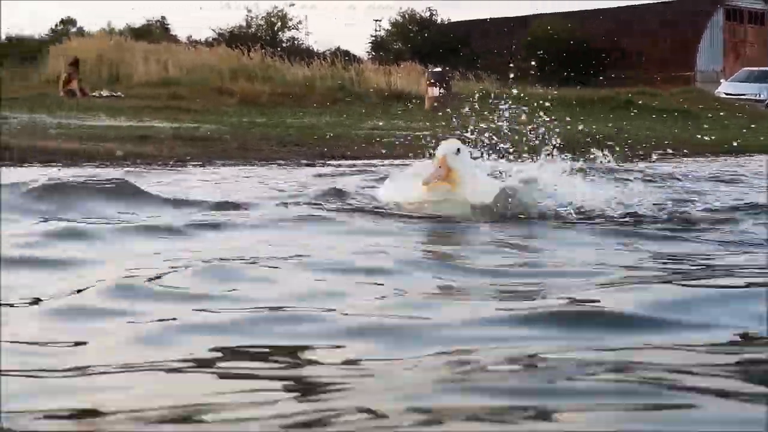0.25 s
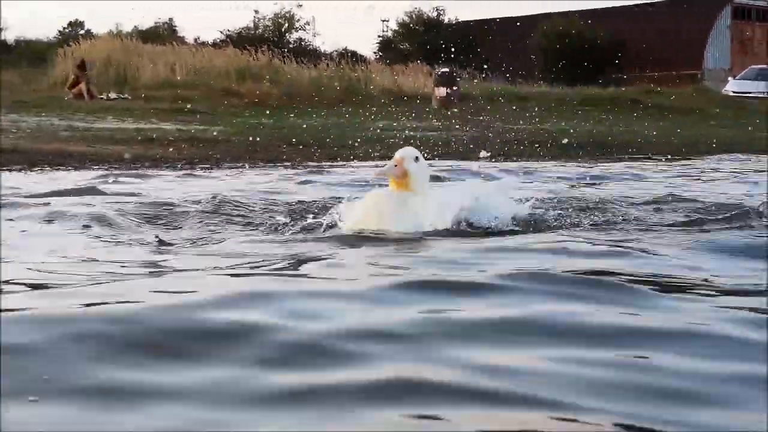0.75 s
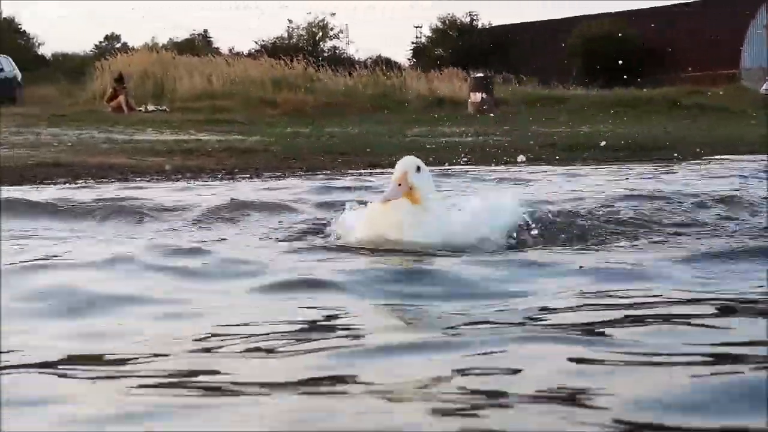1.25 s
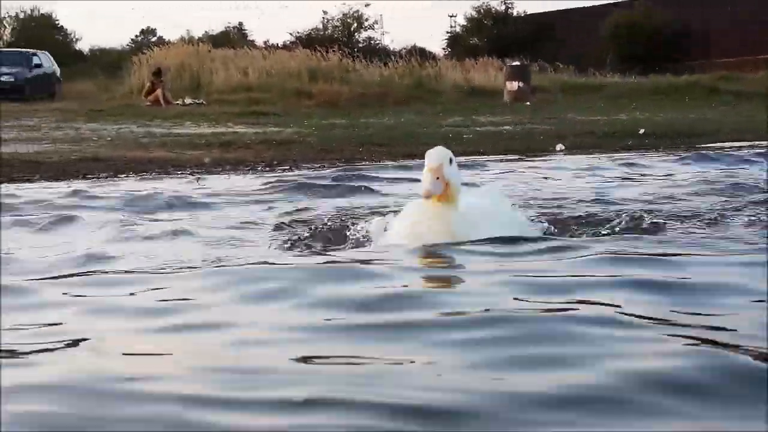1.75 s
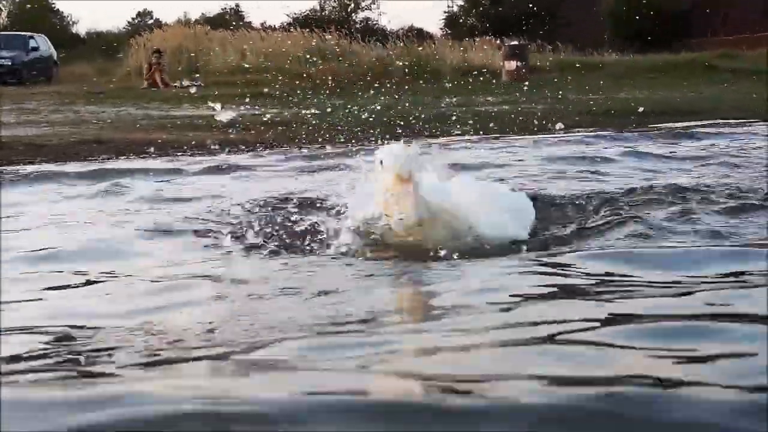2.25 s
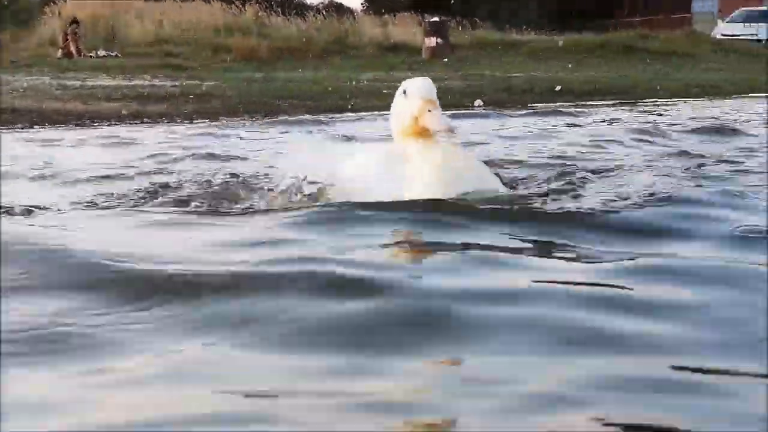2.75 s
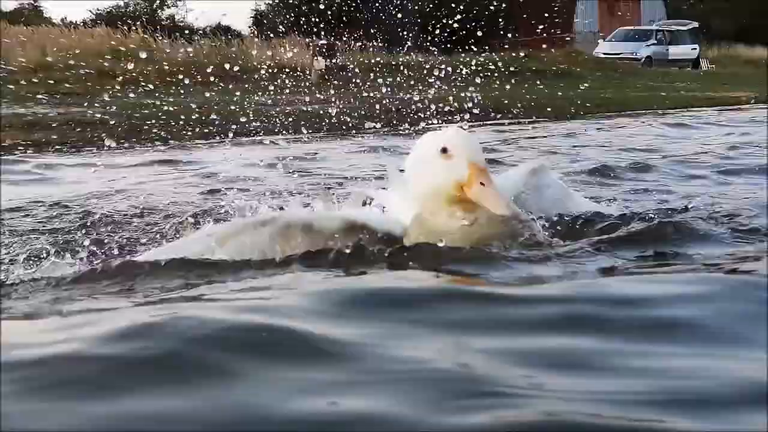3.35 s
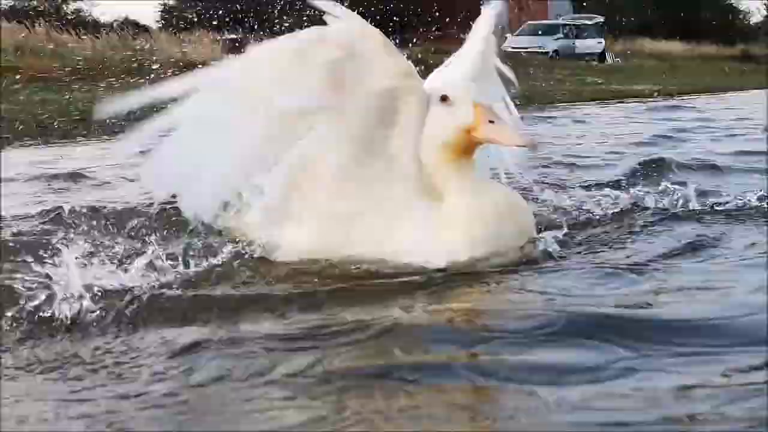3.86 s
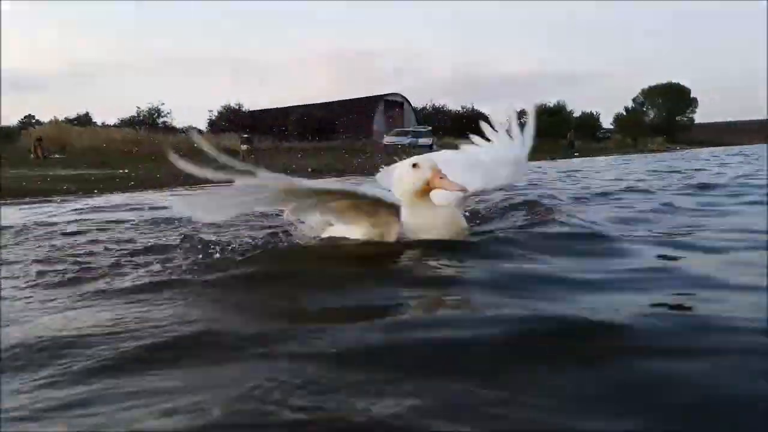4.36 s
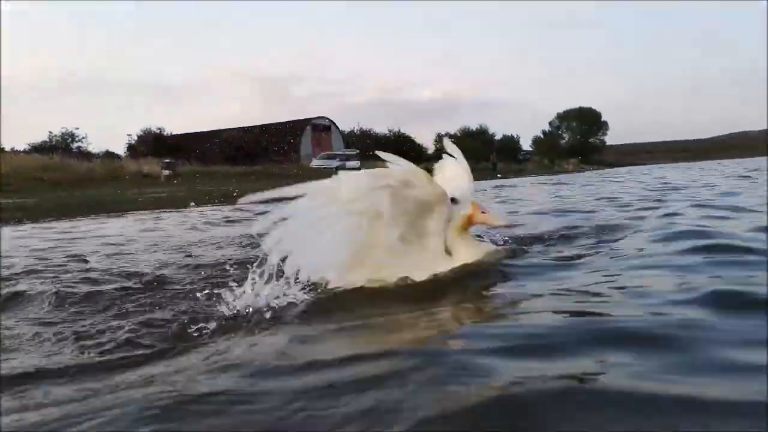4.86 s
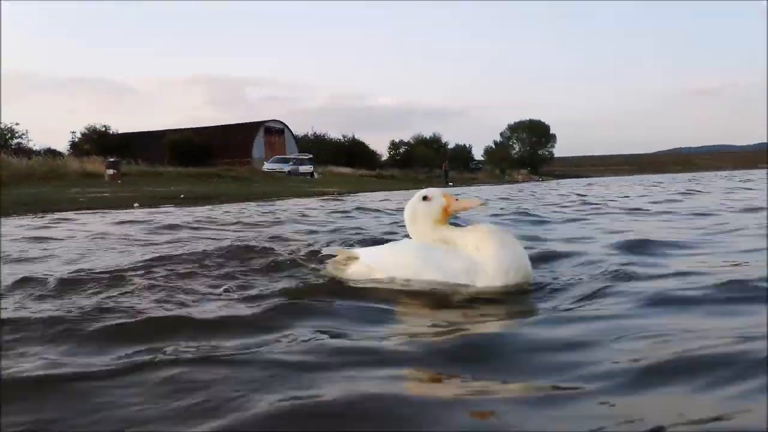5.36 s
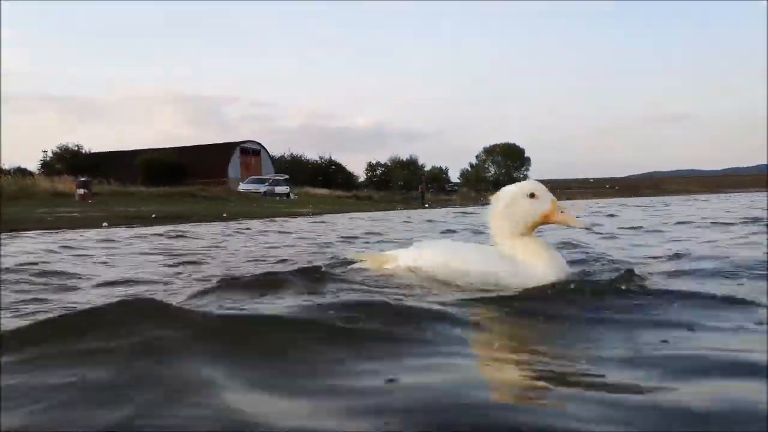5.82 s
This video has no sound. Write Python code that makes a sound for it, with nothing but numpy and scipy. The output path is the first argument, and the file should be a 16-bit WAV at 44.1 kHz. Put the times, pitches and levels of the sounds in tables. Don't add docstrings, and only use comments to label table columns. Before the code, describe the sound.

Open lake, no echo, stereo microphone a few metres from a duck, with deep wind buffeting throughout as rumble, flutter and soft thumps. It begins mid-splash: heavy wet slaps at about 0.06, 0.2 and 0.4 s in churning, hissing spray, another at 0.6 s. From 0.8 to 1.8 s the splashing weakens to small spatters, droplet ticks and fizzing bubbles. Around 1.9 s a loud short bubble pop and renewed slaps start another surge, with bloops and splashes to 2.5 s. From 2.9 s it is closer and fuller, with repeated slaps, a very hard one near 3.37 s, then bright, crisp wingbeat spray from 3.7 to 4.9 s, including strong cracks at 4.7 and 4.86 s. By 5.1 s the splashing fades. Gusts continue over sparse tiny drips, a sharper one near 5.66 s, faint lapping and almost inaudible distant chirps at 5.2-5.4 and 5.8 s.

```python
import sys
import numpy as np
from scipy import signal
from scipy.fft import rfft, irfft, next_fast_len
from scipy.io import wavfile
from scipy.ndimage import uniform_filter1d, map_coordinates

SR = 44100
rng = np.random.default_rng(int(sys.argv[2]) if len(sys.argv) > 2 else 0)


def dump_mix(stems):
    frames = np.atleast_2d(stems).T
    limited = np.clip(frames, -1, 1)
    pcm = np.round(limited * 32767).astype(np.int16)
    wavfile.write(sys.argv[1], SR, pcm)


def gain_from_db(level_db):
    decades = np.asarray(level_db, float) / 20
    return 10 ** decades


N = 268569

# start in seconds, hold in seconds, spray level in dB,
# mist over spray in dB.
STROKES = [(-0.012, 0.0091, -44, -14), (0.064, 0.091, -41.5, -9.5), (0.22, 0.099, -38, -9.5),
           (0.422, 0.11, -42, -8.5), (0.603, 0.069, -45, -7.5), (0.811, 0.033, -47.5, -11),
           (0.94, 0.032, -45.5, -10.5), (1.045, 0.01, -52.5, -13.5), (1.15, 0.02, -50, -10),
           (1.296, 0.041, -48, -7.5), (1.524, 0.002, -50.5, -8), (1.648, 0.0082, -53.5, -9.5),
           (1.72, 0.016, -52, -10.5), (1.887, 0.09, -43.5, -15), (2.068, 0.017, -41, -11),
           (2.231, 0.061, -43.5, -9), (2.434, 0.001, -40, -12), (2.519, 0.051, -43.5, -14.5),
           (2.695, 0.082, -44, -18), (2.838, 0.012, -42.5, -17), (2.901, 0.02, -40, -11.5),
           (3.043, 0.055, -36.5, -8.5), (3.216, 0.034, -35, -13.5), (3.349, 0.11, -41.5, -9),
           (3.556, 0.022, -39.5, -5.5), (3.705, 0.0086, -36, -3.5), (3.861, 0.047, -38.5, -4),
           (3.99, 0.024, -40, -1.5), (4.09, 0.0043, -48, -11), (4.165, 0.003, -42.5, -1.5),
           (4.276, 0.043, -42.5, -3), (4.426, 0.00092, -36.5, -9), (4.515, 0.16, -42, -5),
           (4.712, 0.17, -41.5, -6.5)]
# frequency in Hz, level in dB per Hz.
SPRAY_TONE = [(260, -9), (450, -14), (651, -9), (1000, -4.5), (1110, -8.5), (1850, -2.5), (2050, -4.5),
              (2840, -4.5), (5200, -15), (6760, -34.5), (11400, -120)]
# frequency in Hz, level in dB per Hz.
MIST_TONE = [(2650, -14.5), (4000, -13.5), (5350, -1.5), (6490, -8.5), (8140, -10.5), (9420, -9.5),
             (10800, -16), (11700, -16), (14500, -25.5), (15300, -23), (16300, -38)]
SPRAY_DB, MIST_DB = 1.5, -1
SPRAY_RISE, SPRAY_FALL, SPRAY_LINGER_S = 305, 107, 0.013
MIST_STEEPER = 1.26
SETTLED_S = 5.07

# start in seconds, hold in seconds, rumble level in dB,
# flutter over rumble in dB.
GUSTS = [(-0.01, 0.05, -25.5, -11.5), (0.17, 0.01, -34, -7.5), (0.235, 0.08, -28, -9),
         (0.41, 0.06, -27.5, -7.5), (0.57, 0.1, -29, -17), (0.9, 0.04, -30.5, -21),
         (0.992, 0.035, -26.5, -11), (1.115, 0.045, -24.5, -8), (1.325, 0.002, -33, -14),
         (1.425, 0.044, -29, -14), (1.572, 0.043, -29, -19), (1.825, 0.069, -33, -11.5),
         (1.995, 0.0038, -30, -33), (2.148, 0.2, -26.5, -8.5), (2.43, 0.05, -32.5, -12),
         (2.549, 0.001, -26, -4), (2.642, 0.007, -34, -11), (2.737, 0.18, -29, -9.5), (3.07, 0.23, -30, -7),
         (3.39, .19, -29, -5.5), (3.647, 0.14, -31.5, -4), (3.934, 0.29, -30, 0), (4.34, 0.23, -29.5, -3.5),
         (4.66, 0.3, -29.0, -6.5), (4.969, 0.084, -27.5, -8), (5.133, 0.12, -28.5, -6.5),
         (5.401, 0.073, -27.5, -7.5), (5.515, 0.14, -28.5, -5), (5.842, 0.15, -25.5, -11.5)]
# frequency in Hz, level in dB per Hz.
RUMBLE_TONE = [(11, -38), (18, 1), (64, -3.5), (130, -10.5), (170, -39), (290, -120)]
# frequency in Hz, level in dB per Hz.
FLUTTER_TONE = [(50, -120), (75, 3.5), (110, -8), (160, -2.5), (230, -18.5), (330, -24.5), (500, -35.5),
                (900, -120)]
# frequency in Hz, gain in dB.
PRESSURE_TONE = [(8, -42.0), (22, 1.0), (300, 1.5), (520, -4.0), (900, -67.5)]
RUMBLE_DB, FLUTTER_DB, CALM_DB = -1.5, -1.5, -47
GUST_RISE, GUST_FALL, GUST_LINGER_S = 300, 300, .035
FLUTTER_STEEPER = 1.15
# time in seconds, peak level in dB.
PUFFS = [(0.224, -29.5), (0.308, -28.5), (0.426, -18), (1.149, -21.5), (2.346, -34.5), (2.557, -19.5),
         (3.366, -31), (3.487, -28.5), (3.958, -30), (4.141, -26.5), (4.188, -19), (4.26, -28),
         (4.531, -29.5), (4.717, -26), (4.986, -29), (5.045, -26), (5.224, -29), (5.605, -24), (5.962, -26)]
PUFF_HZ = 195
# time in seconds, peak level in dB, frequency in Hz.
SHOVES = [
    (0.33, -19, 106),
    (1.218, -24, 110),
    (2.637, -16.5, 96),
          (0.235, -37, 56), (0.26, -27, 60), (0.284, -21, 78), (0.348, -26, 92), (0.466, -32, 96),
          (0.531, -22, 54), (0.968, -23.5, 57), (1.011, -30, 53), (1.838, -24.5, 87), (2.15, -21, 61),
          (2.202, -32, 45), (2.257, -28, 103), (2.304, -33.5, 76), (2.543, -22.5, 59), (2.745, -27.5, 54),
          (2.81, -23, 67), (2.862, -25, 79), (3.408, -28, 101), (3.569, -23, 70), (3.662, -28.5, 73),
          (4.105, -22.5, 116), (4.128, -36.5, 42), (4.173, -24.5, 64), (4.199, -24, 78), (4.348, -30, 65),
          (4.389, -23.5, 74), (4.48, -25.5, 69), (4.665, -22, 119), (4.681, -29.5, 100), (4.767, -24, 41),
          (5.003, -25.5, 57), (5.139, -21.5, 108), (5.155, -23, 78), (5.24, -22, 132), (5.443, -25.5, 82),
          (5.521, -22, 112), (5.551, -19.5, 53), (5.566, -19, 49), (5.857, -22.5, 79), (5.877, -21, 86)]
# time in seconds, lag of the left port in samples.
CROSSING = [(0, 38.5)]

# frequency in Hz, level in dB per Hz.
RIPPLE_TONE = [(240, -13), (400, -14), (554, -9), (2140, -11), (4500, -22.5), (11300, -28.5), (15100, -36),
               (16300, -65)]
RIPPLE_DB = -64.5

# time in seconds, peak level in dB, thud in dB, #
# brightness in dB.
SLAPS = [(0.057, -11, -11, -29.5), (0.222, -10, 0, -26.5), (0.322, -46, -13, -30), (0.434, -16, -11, -21),
         (0.608, -19.5, -61, -22), (0.925, -23, -46, -32), (1.916, -24, -5, -46), (1.966, -23, -51, -23.5),
         (2.066, -18.5, -54, -28), (2.432, -18.5, -19, -21), (2.446, -23, -38, -18),
         (2.507, -20, -51, -18.5), (2.895, -13, -52, -40), (3.023, -16.5, -58, -25.5),
         (3.078, -16.5, -43, -26), (3.24, -16, -52, -19), (3.366, -6.5, -14.5, -16.5),
         (3.441, -21.5, -58, -24), (3.537, -16.5, -47, -19.5), (3.695, -15.5, -42, -21),
         (3.854, -20, -32, -15), (3.886, -18, -60, -21), (3.994, -23, -14, -8), (4.182, -28.5, -33, -4),
         (4.293, -18, -21, -19), (4.324, -23, -47, -16.5), (4.429, -17.5, -15, -8.5),
         (4.7125, -11.5, -26, -17.5), (4.856, -21.5, -61, -6.5), (6.084, -34.5, 8, -33)]

# time in seconds, peak level in dB, frequency in Hz,
# 60 dB decay in seconds, left over right in dB.
POCKETS = [(0.331, -22.5, 1250, 0.015, 2), (1.841, -38, 550, 0.065, 4), (1.968, -24, 1250, 0.024, 1),
           (2.053, -25, 1410, .025, 1), (2.289, -16, 1280, .01, 2), (2.436, -21, 2666, .032, 4),
           (2.929, -24, 1620, 0.026, -10), (2.955, -22, 2230, 0.022, 2), (3.023, -21.5, 1005, 0.026, 3),
           (3.143, -29.5, 1290, 0.031, -11), (3.272, -30.5, 956, 0.082, 0), (3.352, -18, 2070, 0.023, -0.5),
           (4.096, -20.5, 3350, .0082, -19), (4.195, -33.5, 846, 0.06, 9), (4.483, -21, 1072, 0.08, -9),
           (4.712, -10, 1490, 0.0091, 8.5), (4.906, -26, 1764, 0.032, -9)]
POCKET_RISE = .07
# time in seconds, peak level in dB, start pitch in Hz,
# 60 dB decay in seconds, pitch rise over that decay as a share.
RISERS = [
    (1.915, -7, 1280, 0.0062, .4),
    (2.067, -27, 1180, 0.038, 0.21),
    (2.107, -25, 876, 0.11, 1),
    (3.437, -30, 1220, 0.05, .44),
    (3.591, -24.5, 1145, 0.037, 0.45),
    (4.506, -30, 1170, 0.05, 0.83),
    (4.776, -33, 1440, 0.053, .57),
    (5.589, -35.5, 1640, .05, .47),
    (5.595, -51, 1200, 0.11, 0.97),
]
# time in seconds, peak level in dB, frequency in Hz,
# left over right in dB.
PLOPS = [(0.058, -23, 1330, 1), (0.432, -35, 2760, -9), (0.433, -39, 4570, -9), (0.881, -37, 3960, -12),
         (0.923, -38, 3360, -6), (0.929, -36.5, 1016, -2), (1.196, -31, 2130, -2), (1.198, -38, 1340, 0),
         (1.294, -33, 2520, -12), (1.404, -39, 2630, -6), (1.477, -51, 3700, -3), (1.522, -31.5, 2070, -1),
         (1.648, -31, 1770, -1), (1.724, -36, 1810, 1), (1.76, -32.5, 1890, -10), (1.836, -34.5, 3900, -12),
         (1.913, -26, 1810, 3), (1.968, -27, 3920, -8), (2.121, -47, 3750, -9), (2.392, -32, 2710, -2),
         (2.505, -38, 2200, 11), (2.506, -37, 1850, -4), (2.506, -30, 3300, -10), (2.595, -22, 2700, 1),
         (2.687, -45, 3570, -12), (2.693, -27.5, 1600, -5), (2.764, -28.5, 1510, -2),
         (2.777, -23.5, 2580, -3), (2.894, -33, 3670, -9), (3.237, -26.5, 1090, 4),
         (3.363, -21.5, 1630, -17), (3.364, -31, 860, 12), (3.534, -33, 1050, -9), (3.535, -31, 3380, -12),
         (3.536, -32, 1550, 7), (3.537, -34, 1920, -12), (3.693, -29, 944, -8), (3.692, -29, 1890, 6),
         (3.693, -26, 3300, -14), (3.852, -33, 2970, -2), (4.297, -31, 1850, -14), (4.34, -31, 1440, -6),
         (4.712, -28, 4130, -4), (4.712, -34, 2700, -6), (4.853, -36, 4570, -6), (4.855, -35, 3770, -10),
         (4.904, -26, 2110, 7), (4.985, -36.5, 2280, 16)]
PLOP_CYCLES, PLOP_RISE = 36, .08
# time in seconds, peak level in dB, frequency in
# Hz, left over right in dB.
DRIPS = [(5.06, -43, 5350, 7), (5.133, -47, 5740, -3), (5.161, -42.5, 1540, -1), (5.195, -52, 1530, 4),
         (5.252, -43, 3070, 6), (5.329, -48, 2830, 0), (5.412, -47.5, 1980, 10), (5.45, -44, 2355, -11),
         (5.487, -52.5, 2670, -15), (5.545, -46, 5440, 1), (5.57, -45, 1780, 15), (5.657, -34.5, 8050, -6),
         (5.85, -40, 1990, -12), (6.027, -48.5, 1335, -3),
         (5.09, -55, 3790, -16), (5.255, -66, 1030, -2), (5.493, -56, 1020, -2),
              (5.495, -69, 5160, -13), (5.535, -54, 1030, 1), (5.589, -53, 2330, -11),
              (5.683, -59, 5170, -18), (5.684, -51, 2800, -11), (5.71, -50, 3490, -4),
              (5.812, -53, 3360, -13), (5.817, -52, 2540, -11), (5.826, -55, 3620, -15),
              (5.87, -68, 5430, 5), (5.963, -65, 3660, -7)]
DRIP_CYCLES, DRIP_RISE = 51, .025

# time in seconds, peak level in dB, frequency in Hz.
MORE_DROPS = [(0.648, -29, 3200), (0.757, -38, 3200), (0.883, -34, 6000), (0.944, -42, 5440), (0.97, -25, 3600),
              (1.2, -32, 3000), (1.2833, -24, 5000), (1.32, -36, 4500), (1.648, -30.5, 5450), (1.84, -30, 1800),
              (2.0, -24.5, 1300), (2.597, -25, 4500), (2.837, -30, 4020), (2.85, -31, 3200), (3.005, -39, 3000),
              (3.2006, -24, 2820), (3.28, -26.5, 3800), (3.464, -25, 3100), (3.958, -20, 5900),
              (4.003, -11, 5060), (4.412, -21, 2500), (4.527, -28, 4500), (4.68, -25.5, 1280),
              (4.7155, -17, 3500), (4.8559, -2, 9500)]
# time in seconds, peak level in dB, frequency in Hz.
DROPS = [(0.79, -34, 4730), (0.849, -40, 4410), (1.0141, -34, 5900), (1.191, -26, 8750), (1.295, -25, 5300),
         (1.3369, -21, 5340), (1.48, -33, 4150), (1.5274, -26, 5430), (2.126, -18, 5360),
         (2.1777, -21.5, 4330), (2.583, -26, 4780), (2.792, -24.5, 3960), (4.106, -19.5, 5460),
         (4.2564, -17, 8900), (4.2758, -18, 5500), (4.5416, -16, 5300), (4.576, -17.5, 5200),
         (4.822, -24, 5570), (4.874, -28, 4670), (4.954, -30, 5380)]
# time in seconds, half length in seconds, peak level in dB,
# frequency in Hz.
SWARMS = [
    (.82, .02, -41, 2350),
    (1.35, .04, -39, 2750),
    (1.74, .03, -46, 2100),
    (2.78, .04, -44, 2700),
    (4.96, .03, -45, 2500),
    (5.78, .045, -56, 3400),
]

# time in seconds, peak level in dB, start pitch in Hz.
BIRD = [
    (5.16, -71, 3900),
    (5.222, -69, 3900),
    (5.292, -68, 3950),
    (5.365, -72, 3900),
    (5.776, -65, 4100),
]
CHIRP_S, CHIRP_FALL_HZ = .017, 430

# frequency in Hz, side level in dB.
WIDTH = [(1200, -4.5), (2000, 3), (8000, 1.5)]
# frequency in Hz, lead of the right port in radians.
BEND_FAR = [(700, 0), (2000, -1.87), (3800, -1.24), (4500, -2.5), (5900, 0), (9000, -1.5), (12000, -6)]
# frequency in Hz, lead of the right port in radians.
BEND_NEAR = [(700, 0), (1400, 0.33), (2200, -2.5), (3800, -1.5), (4500, -2.5), (5500, -5.5), (7600, -5.5),
             (12000, -6.5)]
NEAR_S = 2.98
# frequency in Hz, left over right in dB.
PORTS = [(60, 0.5), (110, -1), (200, -1), (380, -1.5), (700, 1), (1500, -1), (2300, 0), (3900, -8),
         (5400, -4), (7600, 7), (10300, 0.5), (15000, -11.5)]
# frequency in Hz, gain in dB.
TOP_END = [(20, -1.5), (15100, 2.5), (15500, -25.5), (16400, -42), (16600, -87.5)]


def unit(x):
    return x / np.sqrt(np.mean(x ** 2) + 1e-20)


def along(points, hz):
    f, v = np.transpose(points)
    return np.interp(np.log(hz + 1), np.log(f + 1), v)


def curves(rows):
    s, *cols = np.transpose(rows)
    return [np.interp(np.arange(N) / SR, s, c) for c in cols]


def wobble(rate):
    knots = rng.standard_normal(int(N * 400 / SR))
    return map_coordinates(knots, [np.arange(N) * min(rate, 390) / SR])


def filtered(x, points, share=1):
    m = next_fast_len(N + 8192)
    gain = gain_from_db(share * along(points, np.fft.rfftfreq(m, 1 / SR)))
    return irfft(rfft(x, m) * gain, m)[..., :N]


def pair(x, alike):
    turn = np.arccos(np.clip(alike, -1, 1)) / 2
    common, opposed = np.cos(turn) * x[0], np.sin(turn) * x[1]
    return np.array([common + opposed, common - opposed])


def place(s, waves, pan_db):
    start = np.round(s * SR).astype(int)
    at = (start[:, None] + np.arange(waves.shape[1])).ravel()
    ports = []
    for side in (1, -1):
        panned = waves * gain_from_db(side * pan_db / 2)[:, None]
        ports.append(np.bincount(at, panned.ravel(), N + SR)[:N])
    return np.array(ports)


def swells(rows, rise, fall, steeper, linger):
    s, hold, db, over_db = np.transpose(rows)[:, :, None]
    t = np.arange(0, N / SR + .01, .002)
    before_db = (s - linger / 3 - t) * rise
    after_db = (t - s - hold - linger) * fall
    shape_db = -np.maximum(0, np.maximum(before_db, after_db))
    levels = (db + shape_db, db + over_db + steeper * shape_db)
    return [np.interp(np.arange(N) / SR, t, np.linalg.norm(gain_from_db(level), axis=0)) for level in levels]


def patches(depth_db, bins, frames):
    z = signal.stft(rng.standard_normal((2, N + 256)), nperseg=256)[2]
    field = uniform_filter1d(rng.standard_normal(z.shape[1:]), bins, 0)
    field = uniform_filter1d(field, frames, 1)
    return signal.istft(z * gain_from_db(depth_db * unit(field)), nperseg=256)[1][:, :N]


def ring(hz, rise, t60, attack, size):
    t = np.arange(size) / SR
    hz, t60, rise = hz[:, None], t60[:, None], np.reshape(rise, (-1, 1))
    phase = 2 * np.pi * hz * (t + rise * t * t / (2 * t60))
    return np.sin(phase) * gain_from_db(-60 * t / t60) * (1 - np.exp(-t / attack)) * (hz < SR / 3)


def grains(count, hz, spread, cycles, size_db, rise, size):
    when, big, side = rng.random((count, 3)).T
    pitch = hz * np.exp(spread * np.clip(rng.standard_normal(count), -2, 2))
    strength = gain_from_db(-size_db * np.log(1.012 - big))
    t60 = cycles / pitch
    waves = ring(pitch, rise, t60, (t60 / 25)[:, None], size) * strength[:, None]
    return unit(place(when * N / SR, waves, 12 * (side - .5)))


def churn():
    thrown, fine = swells(STROKES, SPRAY_RISE, SPRAY_FALL, MIST_STEEPER, SPRAY_LINGER_S)
    moving = np.clip((SETTLED_S - np.arange(N) / SR) / .12, 0, 1)
    clumps = gain_from_db(1.72 * wobble(45) + 2.63 * wobble(130))
    ticks = grains(count=2500, hz=6000, spread=.45, cycles=4, size_db=4, rise=.1, size=96)
    blips = grains(count=4600, hz=2300, spread=.42, cycles=34, size_db=3, rise=.15, size=600)
    coarse_hiss = clumps * pair(patches(3.65, bins=2, frames=7), 0.41)
    fine_hiss = clumps * pair(patches(2.7, bins=14, frames=2), 0.15)
    spray = unit(filtered(coarse_hiss + 0.51 * ticks, SPRAY_TONE))
    mist = unit(filtered(fine_hiss + 0.44 * ticks, MIST_TONE))
    gurgle = unit(filtered(clumps * blips, SPRAY_TONE, 0.11))
    splash = gain_from_db(SPRAY_DB) * thrown * (.62 * spray + .58 * gurgle)
    return moving * (splash + gain_from_db(MIST_DB) * fine * mist)


def wind():
    gust, stir = swells(GUSTS, GUST_RISE, GUST_FALL, FLUTTER_STEEPER, GUST_LINGER_S)
    eddies = wobble(15)
    low = pair(filtered(rng.standard_normal((2, N)), RUMBLE_TONE), 0.97)
    rumble = unit(gain_from_db(0.96 * eddies) * low)
    lumps = gain_from_db(1.6 * eddies + 3 * wobble(35))
    flutter = unit(lumps * pair(filtered(rng.standard_normal((2, N)), FLUTTER_TONE), 0.97))
    flow = gain_from_db(RUMBLE_DB) * np.hypot(gust, gain_from_db(CALM_DB)) * rumble + gain_from_db(FLUTTER_DB) * stir * flutter
    push = filtered(flow + 4.8 * flow ** 2, PRESSURE_TONE)
    return heard_from(push + puffs(), CROSSING)


def puffs():
    rows = [(s, db, PUFF_HZ) for s, db in PUFFS] + SHOVES
    s, db, hz = np.transpose(rows)[:, :, None]
    t = np.arange(-1800, 1800) / SR
    u = (np.pi * .8 * hz * t) ** 2
    return place(s[:, 0] + t[0], gain_from_db(db + 5.0) * (1 - 2 * u) * np.exp(-u), 0 * s[:, 0])


def heard_from(x, bearing):
    lag, at = curves(bearing)[0], np.arange(N)
    left = map_coordinates(x[0], [at - lag / 2], mode="nearest")
    right = map_coordinates(x[1], [at + lag / 2], mode="nearest")
    return np.array([left, right])


def lake():
    hush = filtered(pair(patches(3, bins=5, frames=8), .11), RIPPLE_TONE)
    drips = grains(count=260, hz=2400, spread=.5, cycles=32, size_db=3.5, rise=.2, size=600)
    ticks = grains(count=150, hz=8000, spread=.35, cycles=9, size_db=4.5, rise=.05, size=128)
    return gain_from_db(RIPPLE_DB) * (unit(hush) + .2 * drips + .13 * ticks)


def slaps():
    s, db, thud_db, bright_db = np.transpose(SLAPS)[:, :, None]
    t = np.arange(3072) / SR
    hz = np.fft.rfftfreq(len(t), 1 / SR)
    wet_db = [along([(150, 5.5), (450, thud + 22), (1000, -9.0), (2800, 2.5), (5000, -9.5), (9000, -33.0)], hz)
              for thud in thud_db[:, 0]]
    wet = gain_from_db(wet_db)[:, None]
    crack = gain_from_db(along(MIST_TONE, hz) * 1.16)
    tear = gain_from_db(along(SPRAY_TONE, hz) * 0.27)
    # colour, level in dB, 60 dB decay in s, attack in s
    layers = [(wet, db - 6, .016, .0007),
              (crack, db + bright_db + 9.5, .01, .0004),
              (tear, db - 20.5, .08, .003)]
    blows = 0
    for colour, level_db, life, attack in layers:
        hiss = irfft(rfft(rng.standard_normal((len(s), 2, len(t)))) * colour)
        shape = (1 - np.exp(-t / attack)) * gain_from_db(level_db - 60 * t / life)
        blows = blows + hiss / hiss.std(axis=2, keepdims=True) * shape[:, None]
    s = s[:, 0]
    middle = place(s, blows[:, 0], 0 * s)
    side = place(s, blows[:, 1], 0 * s) * [[1], [-1]]
    return middle + 0.59 * side


def bubbles():
    rows = [(*pocket, POCKET_RISE) for pocket in POCKETS]
    rows += [(s, db, hz, t60, 0, rise) for s, db, hz, t60, rise in RISERS]
    rows += [(s, db, hz, DRIP_CYCLES / hz, pan_db, DRIP_RISE) for s, db, hz, pan_db in DRIPS]
    rows += [(s, db, hz, PLOP_CYCLES / hz, pan_db, PLOP_RISE) for s, db, hz, pan_db in PLOPS]
    s, db, hz, t60, pan_db, rise = np.transpose(rows)
    return place(s, gain_from_db(db)[:, None] * ring(hz, rise, t60, .0013, size=5000), pan_db)


def drops(rows):
    s, db, hz = np.transpose(rows)
    t = np.arange(400) / SR
    noise = rng.standard_normal((len(s), len(t) + 3))
    thin_noise = noise[:, 3:] - noise[:, :-3]
    spit = thin_noise * gain_from_db(-11.5 - 60 * t / 0.0072) * (1 - np.exp(-t / 0.00059))
    cavity = ring(hz, 0.11, 14 / hz, 0.00029, size=400)
    return place(s, gain_from_db(db)[:, None] * (spit + 0.87 * cavity), 0 * s)


def swarms():
    s, length, db, hz = np.repeat(SWARMS, 14, axis=0).T
    when, pitch, size, side = rng.standard_normal((len(s), 4)).T
    rings = ring(hz * np.exp(.1 * pitch), 0.078, 55 / hz, .0015, size=900)
    return place(s + length * when, rings * gain_from_db(db + 3.5 * size)[:, None], 4 * side)


def bird():
    s, db, top_hz = np.transpose(BIRD)[:, :, None]
    u = np.clip(np.arange(1400) / SR / CHIRP_S, 0, 1)
    phase = 2 * np.pi * CHIRP_S * (top_hz * u - CHIRP_FALL_HZ * u * u / 2)
    return place(s[:, 0], gain_from_db(db) * np.sin(phase) * np.sin(np.pi * u), 0 * s[:, 0])


def round_the_phone(x):
    mid = (x[0] + x[1]) / 2
    side = filtered(x[0] - x[1], WIDTH) / 2
    m = next_fast_len(N + 8192)
    hz, both = np.fft.rfftfreq(m, 1 / SR), rfft([mid + side, mid - side], m)

    def bent(bend):
        return irfft(both * np.exp([[-.5j], [.5j]] * along(bend, hz)), m)[:, :N]

    far, near = bent(BEND_FAR), bent(BEND_NEAR)
    share = np.clip((np.arange(N) / SR - NEAR_S) / .03, 0, 1)
    return far + share * (near - far)


def scene():
    duck = churn() + slaps() + drops(DROPS) + bubbles() + swarms()
    around = lake() + bird() + wind()
    return round_the_phone(duck + drops(MORE_DROPS)) + around


def roll_off(x):
    return signal.sosfilt(signal.butter(12, 16480, fs=SR, output="sos"), x)


def record(dry):
    ports = np.array([filtered(dry[0], PORTS, .5), filtered(dry[1], PORTS, -.5)])
    return roll_off(filtered(ports, TOP_END))


dry = scene()
out = record(dry)
dump_mix(out)
```